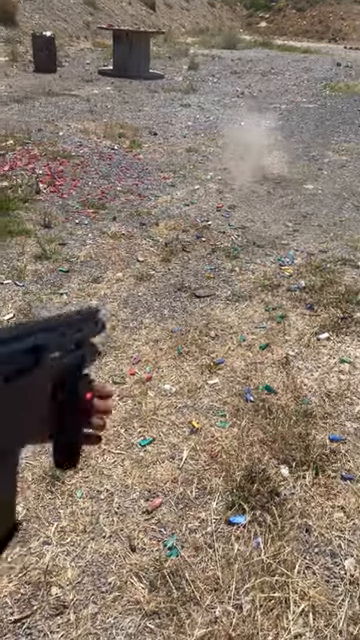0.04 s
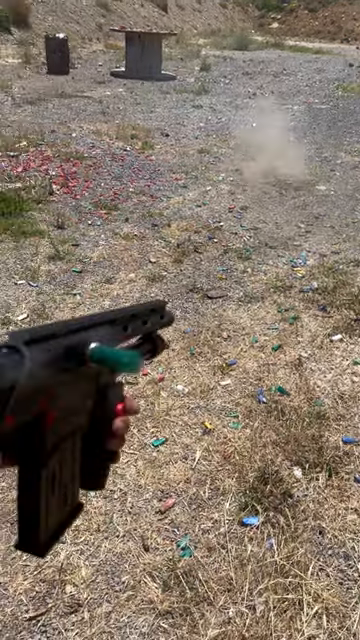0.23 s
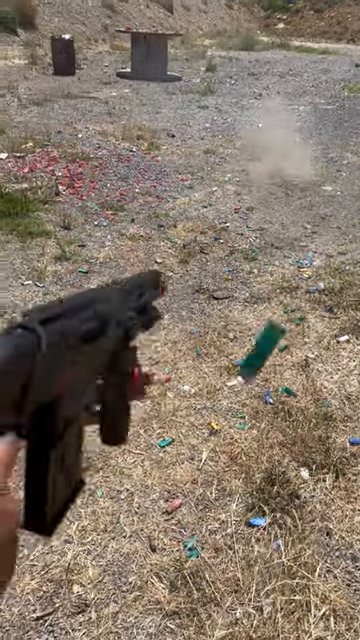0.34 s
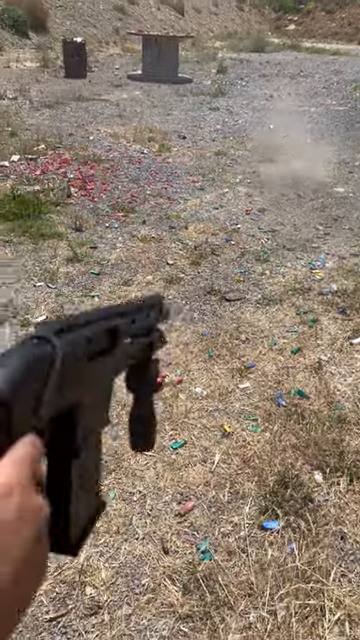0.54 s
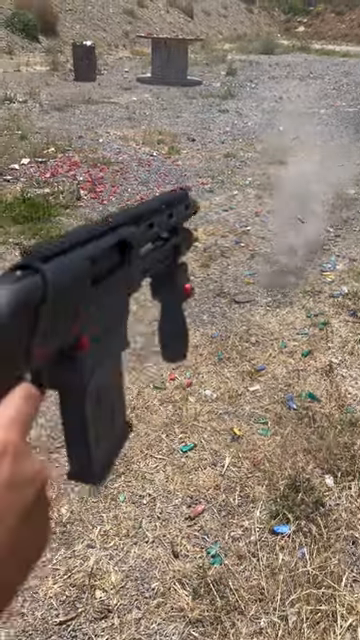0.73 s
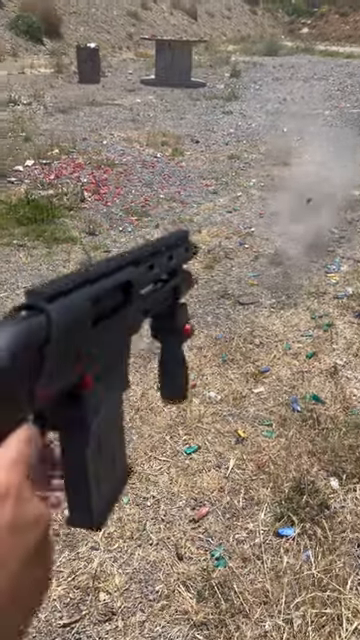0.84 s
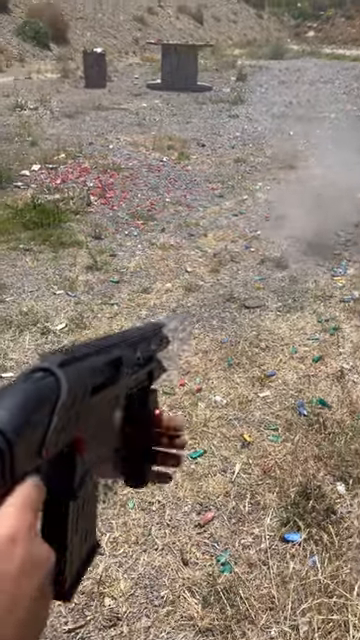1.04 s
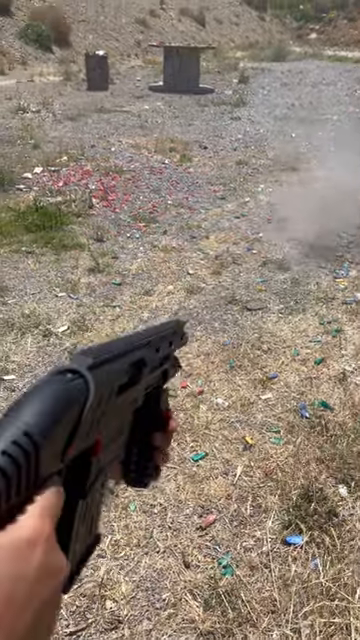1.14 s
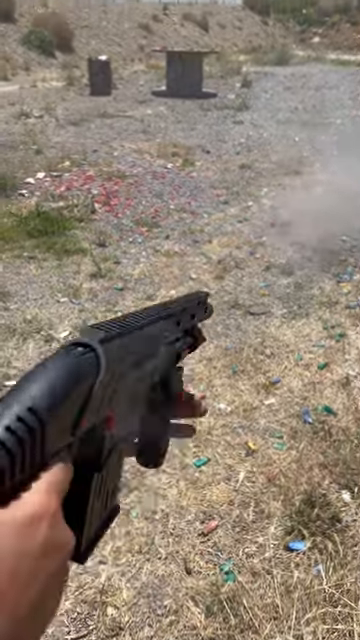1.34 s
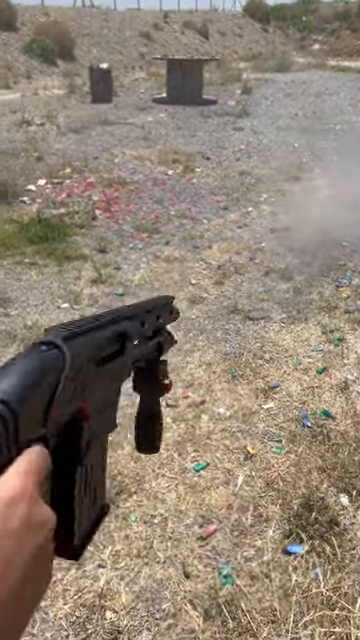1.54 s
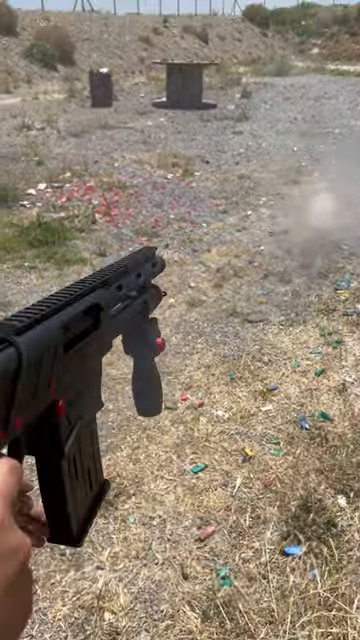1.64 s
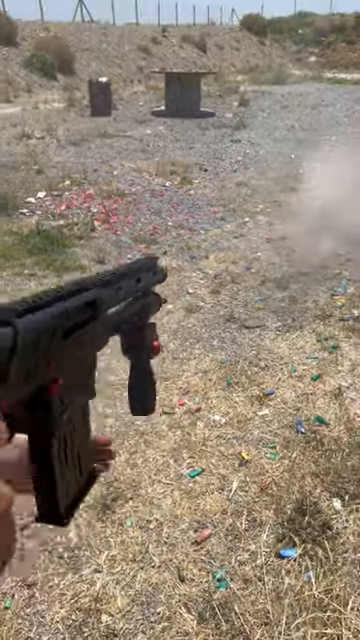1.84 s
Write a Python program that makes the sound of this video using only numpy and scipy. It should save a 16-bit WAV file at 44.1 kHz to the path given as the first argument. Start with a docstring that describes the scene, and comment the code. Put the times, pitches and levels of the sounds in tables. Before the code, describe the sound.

A pump shotgun on an open gravel range: the tail of an earlier shot fades, the action clacks back and forward, a blast cracks, then rack and blast again, heard close through a phone behind the gun.

```python
"""A pump shotgun fires on an open gravel range, heard through a phone held just behind it.
The tail of an earlier shot dies, then twice the action is racked and a shot follows.
Each shot is banded noise: pre-echo, blast, ground scatter and far wash; earth banks return dull thumps.
The action is chatter and friction that excite resonances of steel parts and a hollow magazine.
Small ticks, bumps of hand and stock, a landing shell and steady open air lie beneath."""
import sys
import numpy as np
from scipy import signal
from scipy.fft import rfft, irfft
from scipy.io import wavfile

SR = 44100
rng = np.random.default_rng(int(sys.argv[2]) if len(sys.argv) > 2 else 0)


def dump(signal):
    """Clip the signal to [-1, 1] and save it as 16-bit WAV at the path in sys.argv[1]."""
    limited = np.clip(np.atleast_2d(signal).T, -1, 1)
    pcm = np.round(limited * 32767).astype(np.int16)
    wavfile.write(sys.argv[1], SR, pcm)


def attenuation_scalar(level_db):
    """Turn a level in dB into a linear amplitude multiplier (20 dB per decade)."""
    decades = np.asarray(level_db, float) / 20
    return 10 ** decades


N = 83790

# Shots. Each row: time in seconds, relative level in dB, extra bass in dB.
SHOTS = [(-.294, 3., 0.), (.628, 0., 2.), (1.627, 0., -2.)]
# Stereo width of shots and echoes. Each row: frequency in Hz, side level minus mid level in dB.
SHOT_SIDE = [(60, -10), (150, -10), (380, -1), (1500, -1), (5980, -8.5), (15000, 12)]
# Spectrum of metal contact and rubbing. Each row: frequency in Hz, relative density in dB per Hz.
CRACK = [(590, -10.5), (1000, -0.5), (4990, -4), (9510, -5), (12300, -6.5), (14200, -26.5), (15600, -5),
         (16500, -26)]


def at_hz(points, hz, column=1):
    """Linear interpolation of a table column on a log-frequency axis."""
    p = np.array(points, float)
    return np.interp(np.log(hz + 1), np.log(p[:, 0] + 1), p[:, column])


def butter(order, hz, kind, x):
    """Butterworth filtering: a maximally flat passband."""
    return signal.sosfilt(signal.butter(order, hz, kind, fs=SR, output="sos"), x)


def ring(x, hz, t60):
    """Damped resonance: a unit click sets off a sine of initial height 1 that falls 60 dB in t60 seconds."""
    r, w = attenuation_scalar(-60 / (t60 * SR)), 2 * np.pi * hz / SR
    # the tiny offset keeps the recursion away from vanishingly small numbers
    return signal.lfilter([0, np.sin(w)], [1, -2 * r * np.cos(w), r * r], x + 1e-18)


def colour(x, spectrum):
    """Spectral shaping with unit mean power gain: white noise of rms 1 keeps rms 1."""
    gain = attenuation_scalar(at_hz(spectrum, np.fft.rfftfreq(N, 1 / SR)))
    return irfft(rfft(x) * gain / np.sqrt(np.mean(gain ** 2)), N)


def clicks(s, db):
    """Impulsive excitation: single-sample clicks; those outside the scene are left out."""
    out, i = np.zeros(N), (np.asarray(s) * SR).astype(int)
    inside = (i >= 0) & (i < N)
    np.add.at(out, i[inside], attenuation_scalar(np.asarray(db))[inside])
    return out


def dying(t, t60):
    """Exponential decay: silent before zero, then a fall of 60 dB in t60 seconds."""
    return (t >= 0) * attenuation_scalar(-60 * np.clip(t, 0, 9) / t60)


def burst(s, db, rise, t60):
    """Impact envelope: an exponential rise with time constant rise to a peak at s, then exponential decay."""
    t = np.arange(N) / SR - s
    growth = np.exp(np.clip(t / max(rise, 1e-4), -40, 0))
    return attenuation_scalar(db) * np.where(t < 0, growth, dying(t, np.clip(t60, .004, .1)))


def flutter(rate):
    """Random modulation: Gaussian noise through two equal low-pass poles at rate Hz, scaled to spread 1."""
    r = np.exp(-2 * np.pi * rate / SR)
    x = signal.lfilter([1], [1, -2 * r, r * r], rng.standard_normal(N))
    return x / x.std()


def thump(s, db, hz):
    """Heavily damped resonance: a softened click rings for a few low cycles."""
    cycles = 3.38  # length of the 60 dB decay
    return ring(butter(2, 2 * hz, "low", clicks([s], [db])), hz, cycles / hz)


def ports(mid, side_table):
    """Phase difference between two close microphone ports: a quarter-cycle-shifted side signal."""
    side = irfft(1j * rfft(mid) * attenuation_scalar(at_hz(side_table, np.fft.rfftfreq(N, 1 / SR))), N)
    return np.array([mid + side, mid - side])


def spread(mid, side):
    """Mid/side stereo: the side signal enters the two channels with opposite signs."""
    return mid + side * [[1], [-1]]


def shots():
    """Frequency-dependent decay: half-octave noise bands of pre-echo, blast, ground scatter and far wash."""
    # Noise of a shot. Each row: frequency in Hz, then relative blast level in dB, ground scatter
    # level in dB and its t60 in seconds, far wash level in dB and its t60 in seconds.
    shot_bands = [(61, -39.5, -56.5, 0.34, -42, 0.5), (160, -21.5, -46, .25, -51.5, 0.91),
                  (390, -23, -38, 0.3, -41.5, 0.67), (950, -25.5, -33, 0.27, -58, 1.11),
                  (2260, -21.5, -33, 0.19, -48, 0.66), (5900, -25.5, -34.5, 0.18, -48, 0.59),
                  (9840, -28.5, -31.5, 0.17, -36, 0.37), (14800, -32, -57, .1, -91, 0.42)]
    blast_hold_s, blast_t60_s = 0.0011, 0.029
    # pre-echo: noise smeared ahead of the blast, not part of the shot itself
    pre_echo_s, pre_echo_db, pre_echo_db_per_s, pre_echo_top_hz = 0.02, -5.5, 1001.5, 6000
    crackle_db, crackle_hz = 4, 89  # uneven ground makes the scatter flutter
    t, out = np.arange(N) / SR, 0
    edges = 35 * 2 ** np.arange(0, 9.3, .5)
    white = rng.standard_normal((2, 2, N))
    rough = [attenuation_scalar(crackle_db * flutter(crackle_hz)) for _ in range(3)]
    for k, (low, high) in enumerate(zip(edges, edges[1:])):
        hz, power = np.sqrt(low * high), 0
        blast_db, near_db, near_t60, far_db, far_t60 = (
            at_hz(shot_bands, hz, column=c) for c in range(1, 6))
        for s, db, bass_db in SHOTS:
            u = t - s
            pre_echo = (u > -pre_echo_s) * attenuation_scalar(pre_echo_db + pre_echo_db_per_s * np.clip(u, -1, 0))
            pre_echo = pre_echo / (1 + (hz / pre_echo_top_hz) ** 4)
            fall = dying(np.maximum(u - blast_hold_s, 0), blast_t60_s)
            blast = attenuation_scalar(blast_db) * np.where(u < 0, pre_echo, fall)
            scatter = attenuation_scalar(near_db) * rough[k % len(rough)] * dying(u, near_t60)
            wash = attenuation_scalar(far_db) * dying(u, far_t60)
            gain_db = db + bass_db / (1 + (hz / 200) ** 2)
            power = power + attenuation_scalar(2 * gain_db) * (blast ** 2 + scatter ** 2 + wash ** 2)
        noise = white[k % 2] * np.sqrt(power * SR / (high - low))  # even out the bandwidth
        mid, side = butter(3, [low, min(high, .45 * SR)], "band", noise)
        out = out + spread(mid, attenuation_scalar(at_hz(SHOT_SIDE, hz)) * side)
    return out


def echoes():
    """Delayed reflection: thumps and dull hiss of the blast itself, then of each bank of earth."""
    # Returns. Each row: delay in seconds, relative thump level in dB, thump frequency in Hz,
    # relative hiss level in dB, time for the hiss to reach its peak in seconds.
    echo_table = [(.001, -11.5, 550, -40.5, 0.0046), (-.003, -9.5, 147.3, -40.5, 0.004),
                  (.059, -15, 85, -43, 0.015), (0.089, -8.5, 420, -29.5, 0.0013),
                  (0.161, -23.5, 80, -49, 0.0068), (.198, -15.5, 184, -53, 0.003),
                  (.243, -30.5, 356, -50, .004), (0.276, -25, 330, -44, 0.012),
                  (0.296, -26, 210, -47, 0.0055)]
    t, low, puff = np.arange(N) / SR, np.zeros(N), np.zeros(N)
    for s, db, bass_db in SHOTS:
        for delay, thump_db, hz, hiss_db, length in echo_table:
            early_bass_db = bass_db * np.exp(-delay / 0.021)
            low += thump(s + delay, db + thump_db + early_bass_db, hz)
            if delay > .22:  # far banks answer in broken pieces
                low -= thump(s + delay + rng.uniform(0.0015, 0.00924), db + thump_db - 0.5, hz)
            u = np.clip((t - s - delay) / length, 0, 30)
            puff += attenuation_scalar(db + hiss_db) * u * np.exp(1 - u)
    hiss = butter(2, [300, 3320], "band", puff * rng.standard_normal((2, N)))
    return ports(low, SHOT_SIDE) + spread(2 * hiss[0], hiss[1])


def body(steel_force, magazine_force):
    """Modal resonance: two forces ring the steel parts and the hollow magazine, with the bass cut."""
    # Modes of the steel parts. Each row: frequency in Hz, relative level in dB, t60 in seconds.
    steel_modes = [(1720, -6., .012), (2700, -4., .012), (3700, -3., .015), (5200, -5., .015),
                   (6900, -4., .015)]
    # Modes of the hollow magazine. Each row: frequency in Hz, relative level in dB, t60 in seconds.
    magazine_modes = [(630, -9., .03), (760, -5., .02), (870, -2., .025), (960, -3., .025)]
    rings = sum(attenuation_scalar(db) * ring(steel_force, hz, t60) for hz, db, t60 in steel_modes)
    for k, (hz, db, t60) in enumerate(magazine_modes):
        rings = rings + (-1) ** k * attenuation_scalar(db) * ring(magazine_force, hz, t60)  # alternating polarity
    return butter(4, 540, "high", rings)


def contacts():
    """Impact excitation: chatter bursts crack and ring the body; slams add a knock and a low push."""
    # Light contacts in the action. Each row: start in seconds, relative peak in dB, t60 in seconds.
    contact_table = [(0.042, -27, 0.0045), (0.1307, -23.5, 0.061), (0.1552, -17.5, 0.021),
                     (0.176, -24, 0.021), (0.189, -19.5, 0.082), (0.2032, -16.5, 0.06),
                     (0.2252, -5.5, 0.0063), (0.252, -16, 0.0073), (0.314, -24, 0.033),
                     (0.3302, -4.5, 0.026), (0.3421, -9, 0.024), (.977, -36, .012), (1.106, -35.5, 0.019),
                     (1.1335, -28, 0.021), (1.1493, -19, 0.042), (1.1629, -13, 0.018), (1.178, -23, 0.01),
                     (1.1869, -20, 0.027), (1.2005, -21.5, 0.047), (1.2253, -13, 0.018),
                     (1.2558, -20, 0.037), (1.3104, -36, 0.011), (1.3242, -13, 0.02), (1.338, -16, 0.017)]
    # The bolt hits its stops. Each row: peak time in seconds, relative peak in dB, rise time constant
    # in seconds, t60 in seconds, relative magazine ring in dB, relative push in dB.
    slam_table = [(0.24, 3.5, 0.0017, 0.029, -12.5, -55), (0.363, -2, 0.0034, 0.043, 0, -55),
                  (.402, 4, 0.00043, 0.037, -6, -3), (1.242, -1.5, 0.0032, 0.022, -11.5, -2),
                  (1.3567, -9.5, 0.0052, 0.022, 6, -60), (1.3867, 3.5, 0.00031, 0.032, -6, 1.5)]
    contact_rise_s, max_lean = 0.00062, 1
    crack_db, modes_db, ring_all_db, light_ring_db = -17, -49.5, -37, -23
    knock_db, push_all_db, push_hz = -12, -9.5, 122
    noise = rng.standard_normal((3, N))
    crack = colour(noise[0], CRACK)
    upper_middle = butter(2, [2200, 5000], "band", crack)
    level, lean = np.zeros(N), np.zeros(N)
    # each light contact leans by chance to or from the upper middle
    for (s, db, t60), tilt in zip(contact_table, rng.uniform(-max_lean, max_lean, len(contact_table))):
        shape = burst(s + contact_rise_s, db, contact_rise_s / 2, t60)
        level, lean = level + shape, lean + tilt * shape
    hollow, push, knock = attenuation_scalar(light_ring_db) * level, 0, 0
    for s, db, rise, t60, ring_db, push_db in slam_table:
        shape = burst(s, db, rise, t60)
        level, hollow = level + shape, hollow + attenuation_scalar(ring_db) * shape
        knock = knock + clicks([s], [db + ring_db + knock_db])
        push = push + ring(clicks([s], [db + push_db + push_all_db]), push_hz, 0.5 / push_hz)
    direct = attenuation_scalar(crack_db) * (level * crack + lean * (2 * upper_middle - crack))
    steel_force = attenuation_scalar(modes_db) * level * noise[1]
    magazine_force = attenuation_scalar(ring_all_db) * hollow * noise[2] + knock
    return direct + push + body(steel_force, magazine_force)


def strokes():
    """Stick-slip friction: dense clumped slips of the sliding fore-end, heard direct and through the body."""
    # Fore-end slides, joined by straight lines. Each row: time in seconds, rubbing level in dB,
    # relative magazine ring in dB.
    stroke_table = [(.12, -70.5, -22), (.185, -53, 14), (0.237, -34.5, -4.5), (0.27, -56.5, 22.5),
                    (0.312, -65.5, 18), (0.345, -38.5, 17), (0.4, -34.5, 12), (0.444, -58, 12.5),
                    (0.529, -75, 18), (1.1, -69.5, 9.5), (1.2, -46, 2.5), (1.238, -53, 26.5),
                    (1.297, -65, 15), (1.345, -43, 18), (1.386, -35, 13.5), (1.422, -57, 14),
                    (1.5, -79.5, 13)]
    slips_per_s, slip_spread_db, clump_db, clump_hz = 1900, 2.5, 3, 140
    s, db, ring_db = np.transpose(stroke_table)
    db, ring_db = (np.interp(np.arange(N) / SR, s, c) for c in (db, ring_db))
    happens = rng.random(N) < slips_per_s / SR
    slips = happens * attenuation_scalar(slip_spread_db * rng.exponential(1, N)) * rng.choice([-1, 1], N)
    slips = slips / slips.std() * attenuation_scalar(db + clump_db * flutter(clump_hz))
    return colour(slips, CRACK) + body(attenuation_scalar(-24) * slips, attenuation_scalar(ring_db - 28) * slips)


def pings():
    """Single-mode resonance: each touch of a small part rings one pitch."""
    # Ticks. Each row: time in seconds, relative level in dB, frequency in Hz.
    ping_table = [(0.133, -36, 2270), (0.1574, -23.5, 4190), (0.207, -40, 2840), (0.3296, -29, 2680),
                  (1.001, -49.5, 2110), (1.019, -50, 2700), (1.03, -47.5, 1710), (1.086, -57, 3850),
                  (1.15, -44, 2340)]
    cycles = 38  # length of the 60 dB decay
    return sum(ring(clicks([s], [db]), hz, cycles / hz) for s, db, hz in ping_table)


def bumps():
    """Heavily damped resonance: hand and stock bump softly."""
    # Bumps. Each row: time in seconds, relative level in dB, frequency in Hz.
    bump_table = [(0.164, -30.5, 86), (0.52, -33, 70.5), (0.544, -33, 138)]
    return sum(thump(*row) for row in bump_table)


def shell():
    """Cavity resonance: the spent shell lands and a short noise scuff rings its hollow hull."""
    scuff = burst(.49, -66, rise=0.00117, t60=0.057) * rng.standard_normal(N)
    return ring(scuff, hz=1200, t60=.035)


def open_air():
    """Stationary noise: two independent coloured noises form the mid and a weaker side."""
    # Spectrum of the air. Each row: frequency in Hz, relative density in dB per Hz.
    air_spectrum = [(18, -31.5), (30, 13), (71, 0.5), (472, -27.5), (8250, -31), (11000, -42),
                    (15000, -52.5)]
    mid, side = (attenuation_scalar(-60.5) * colour(n, air_spectrum) for n in rng.standard_normal((2, N)))
    return spread(mid, attenuation_scalar(-5) * side)


def scene():
    """Superposition: the sounds of gun, range and open air add."""
    # Stereo width of the action. Each row: frequency in Hz, side level minus mid level in dB.
    action_side = [(60, -23.5), (180, -22.5), (550, -2.5), (1650, -12.5), (4970, -12), (15000, 11)]
    action = contacts() + strokes() + pings() + bumps() + shell()
    return shots() + echoes() + ports(action, action_side) + open_air()


def low_pass(x):
    """Removes everything above the highest recorded frequency."""
    return signal.sosfilt(signal.butter(12, 17140, fs=SR, output="sos"), x)


def record(dry):
    """Band limiting and phase dispersion: a steep low cut, all-pass stages that delay bass, a top cut."""
    smear_hz, stages = 154.4, 4
    x = butter(6, 43.5, "high", dry)
    a = np.exp(-2 * np.pi * smear_hz / SR)
    for _ in range(stages):
        x = signal.lfilter([-a, 1], [1, -a], x)
    mix = signal.sosfilt(signal.cheby2(10, 60, 16580, fs=SR, output="sos"), x)
    return low_pass(mix)


dry = scene()
out = record(dry)
dump(out)
```